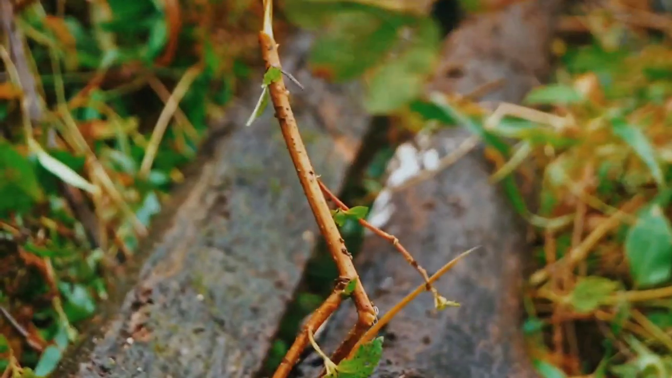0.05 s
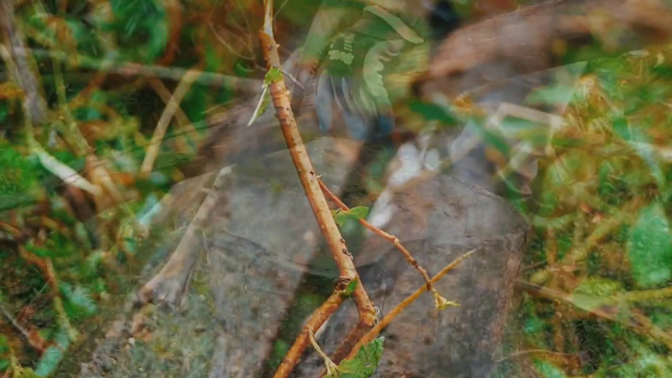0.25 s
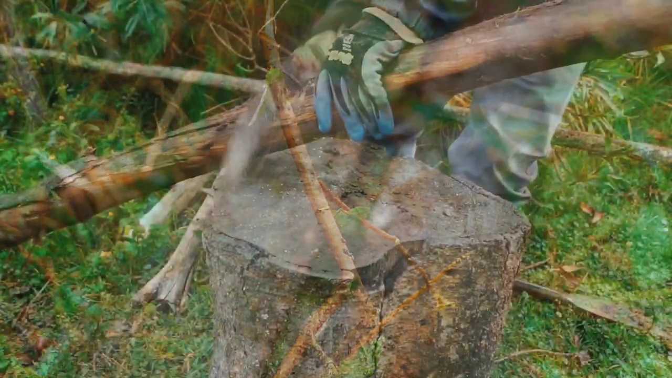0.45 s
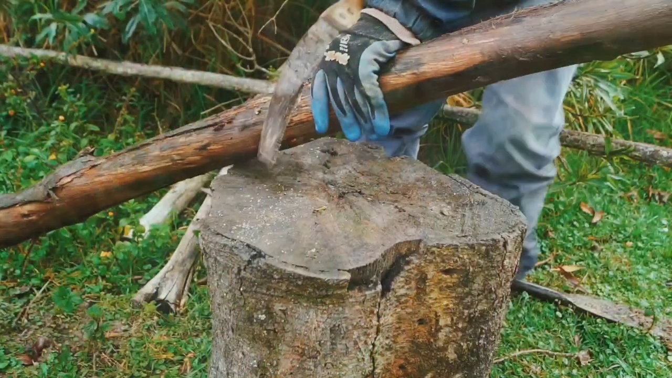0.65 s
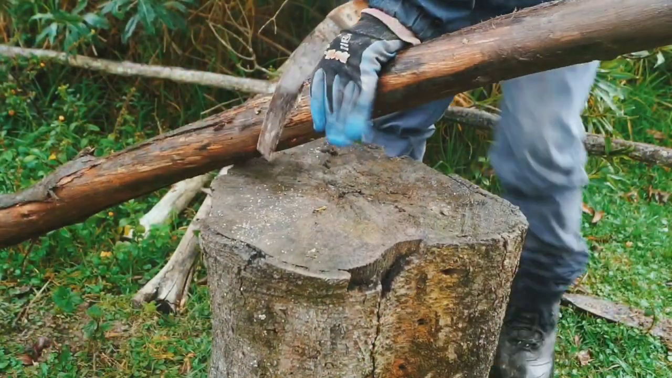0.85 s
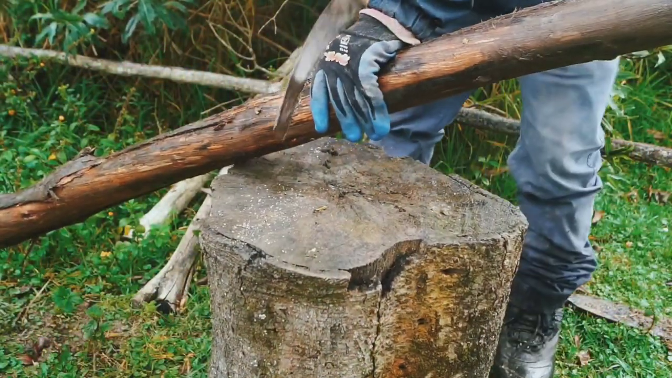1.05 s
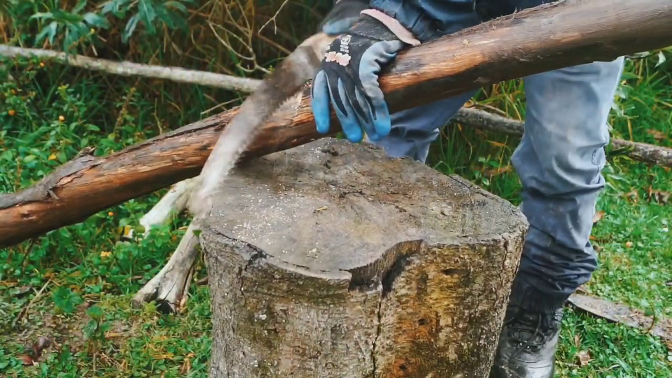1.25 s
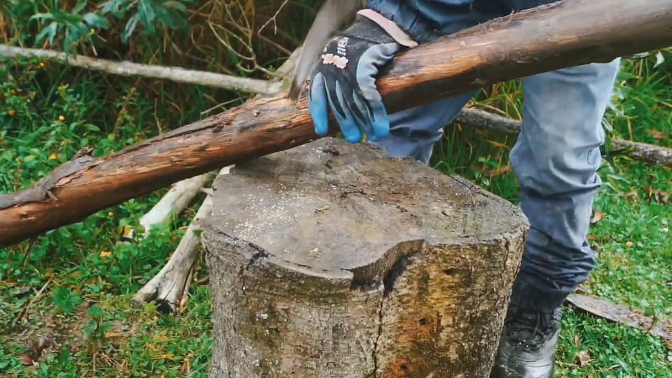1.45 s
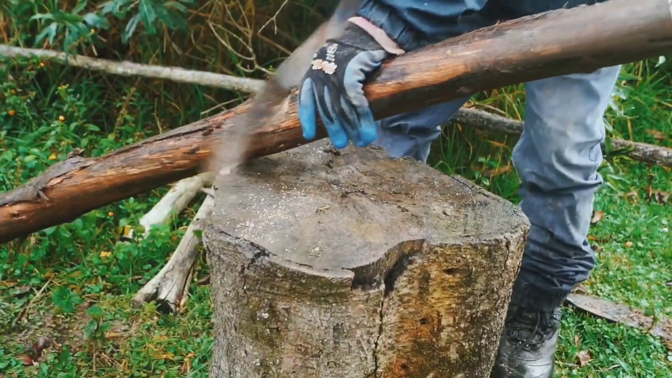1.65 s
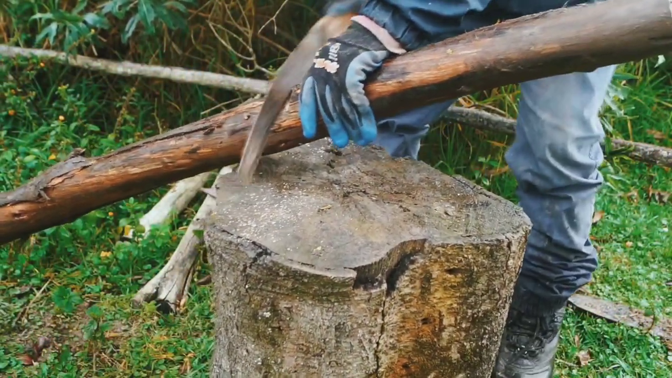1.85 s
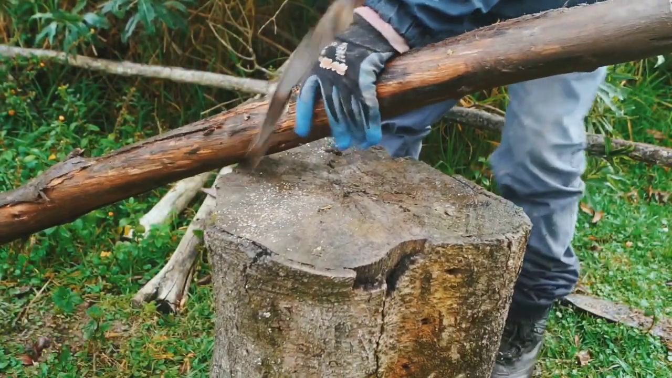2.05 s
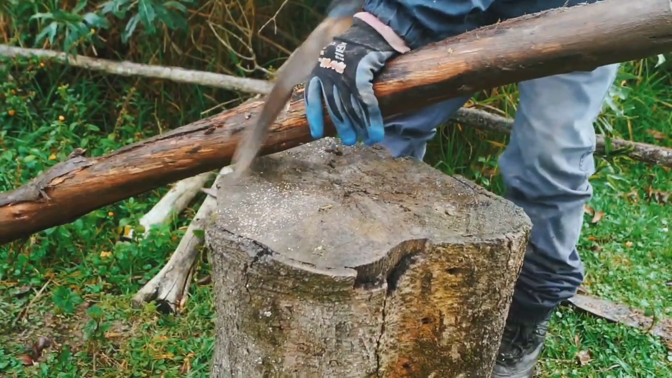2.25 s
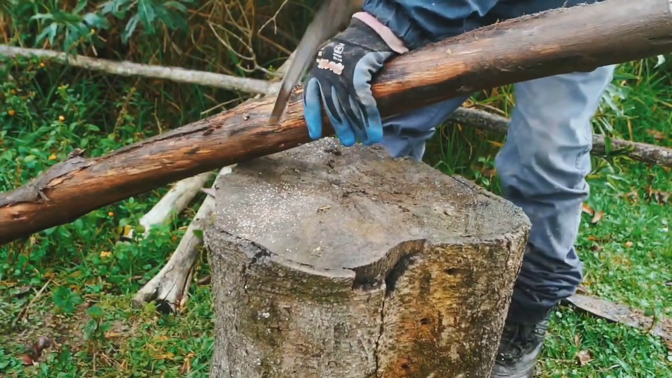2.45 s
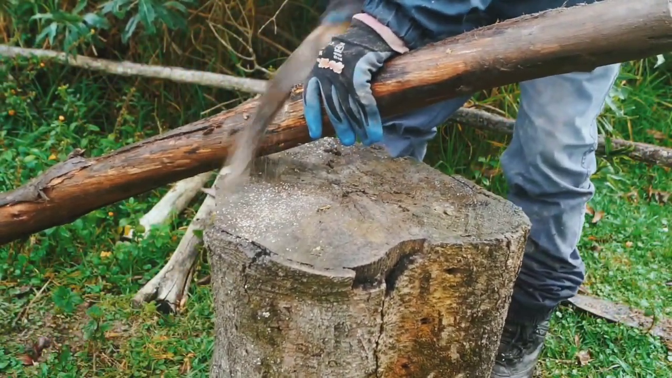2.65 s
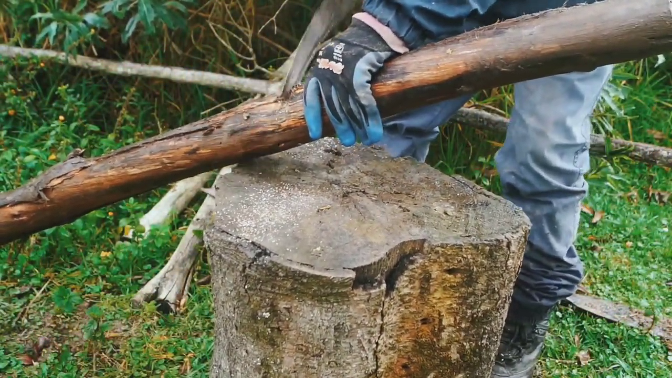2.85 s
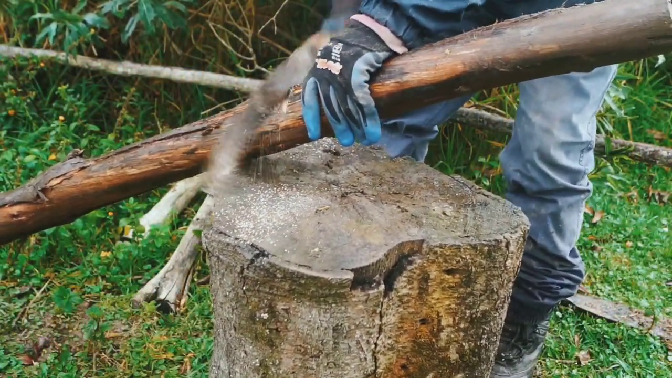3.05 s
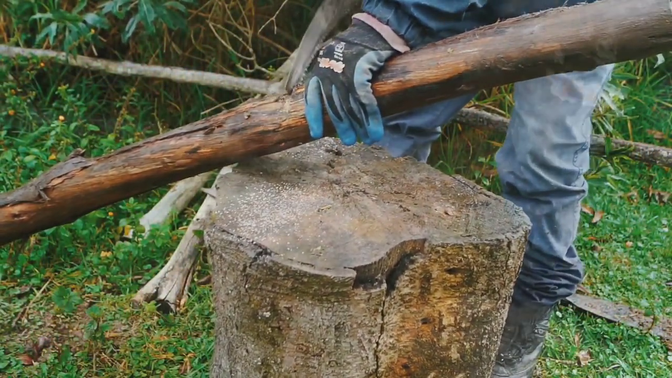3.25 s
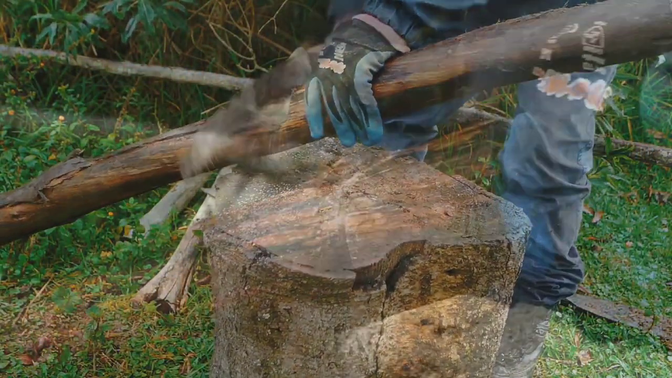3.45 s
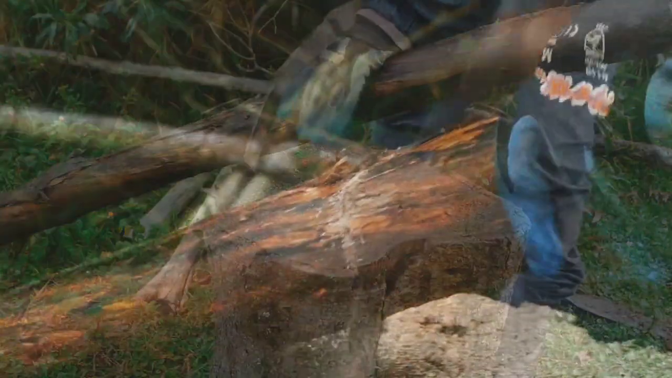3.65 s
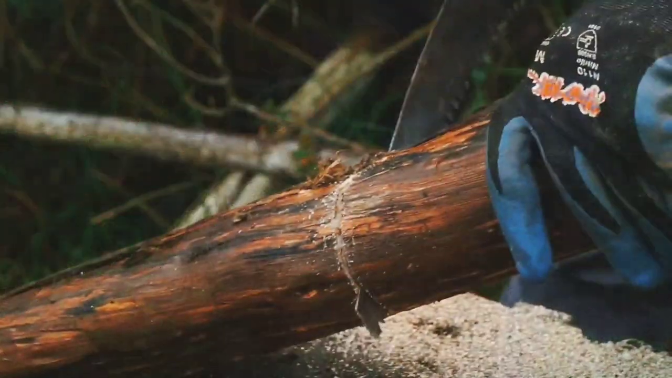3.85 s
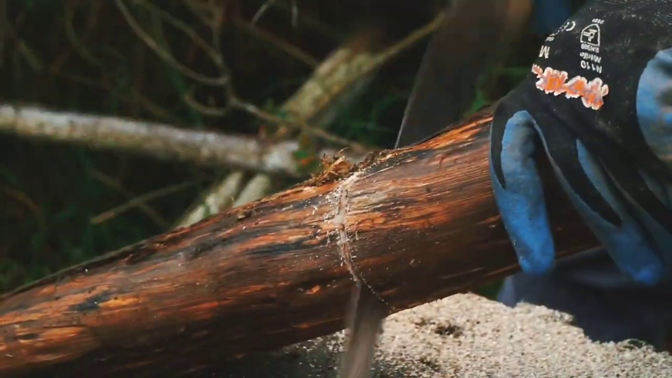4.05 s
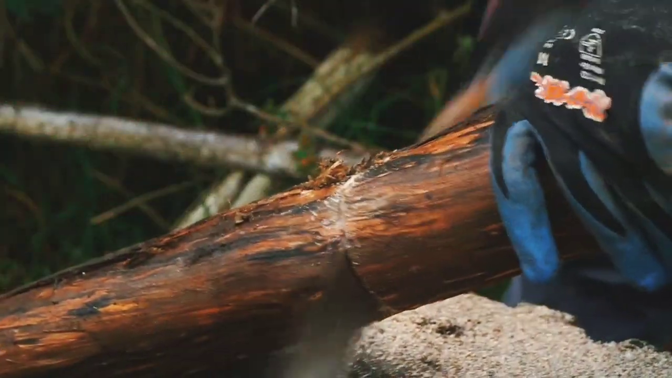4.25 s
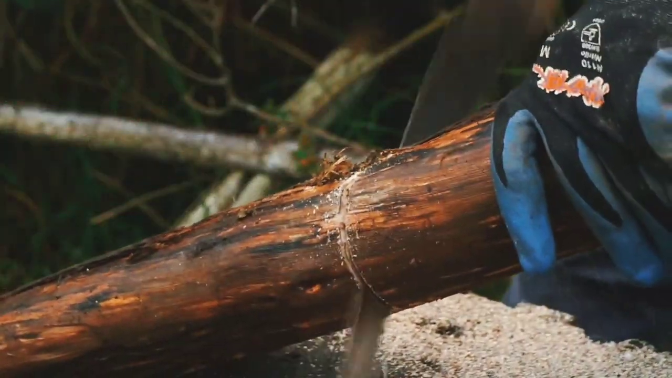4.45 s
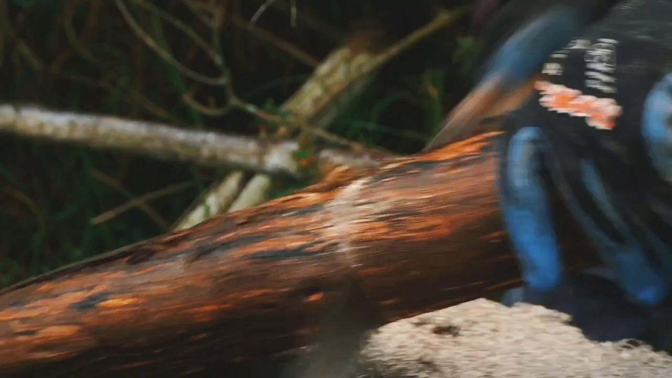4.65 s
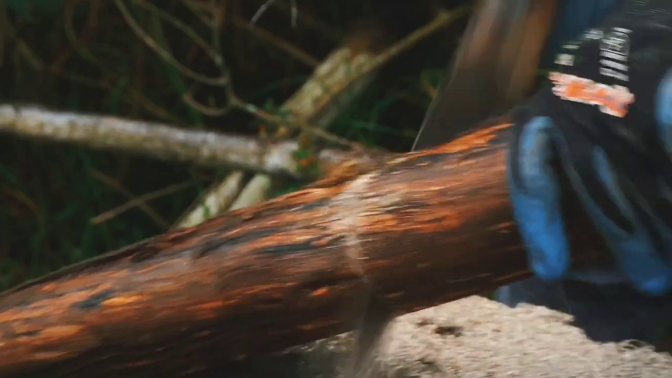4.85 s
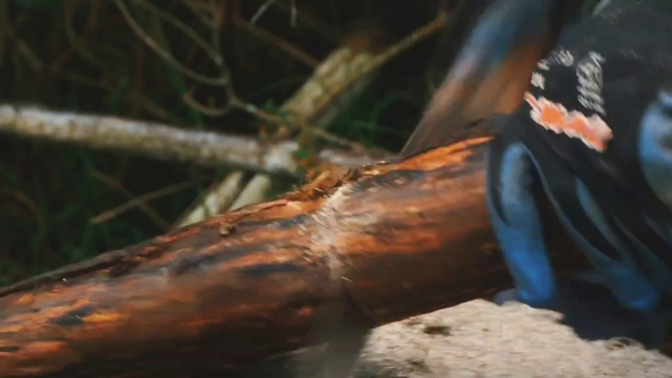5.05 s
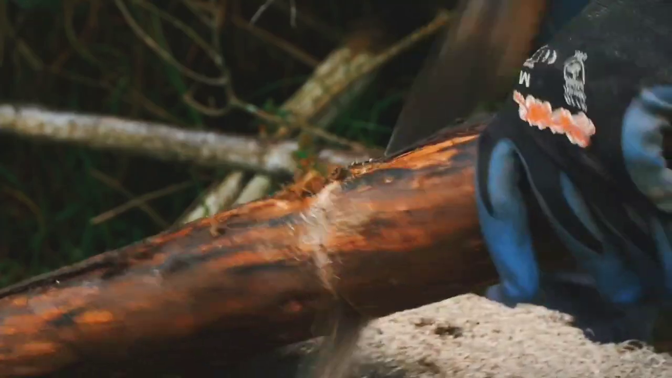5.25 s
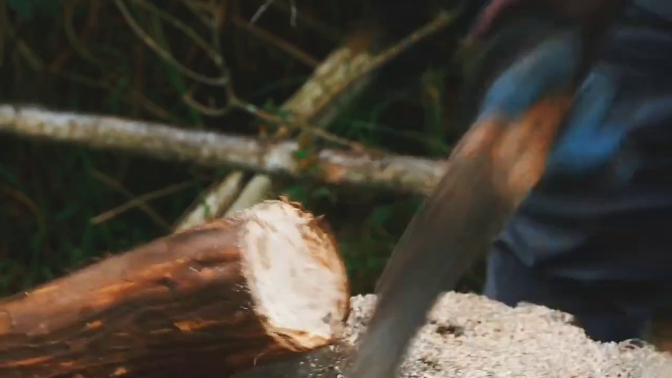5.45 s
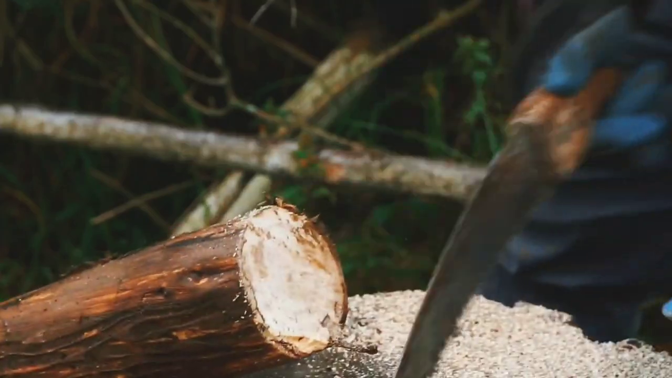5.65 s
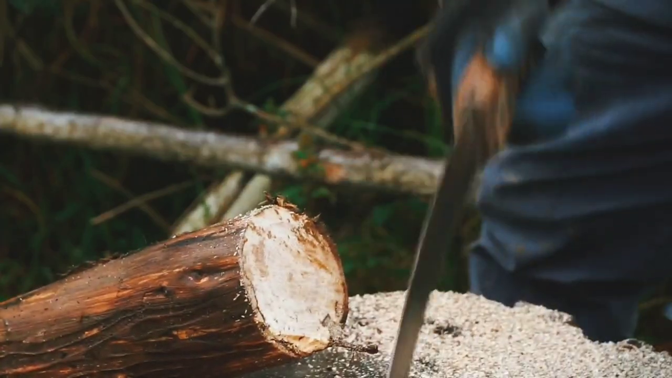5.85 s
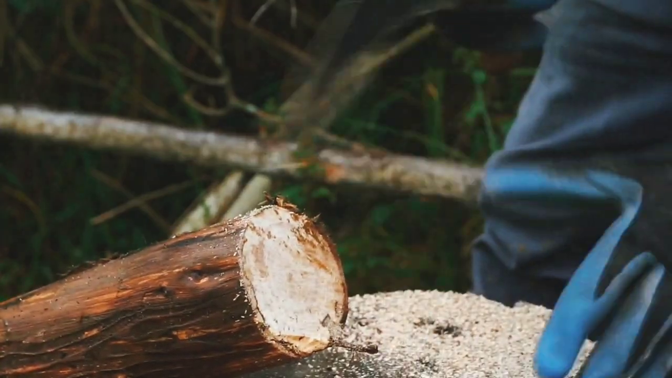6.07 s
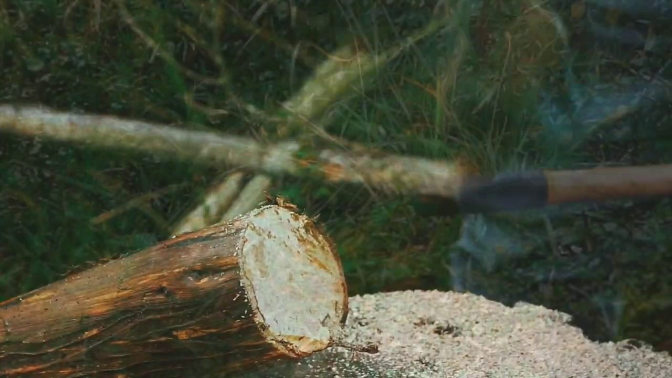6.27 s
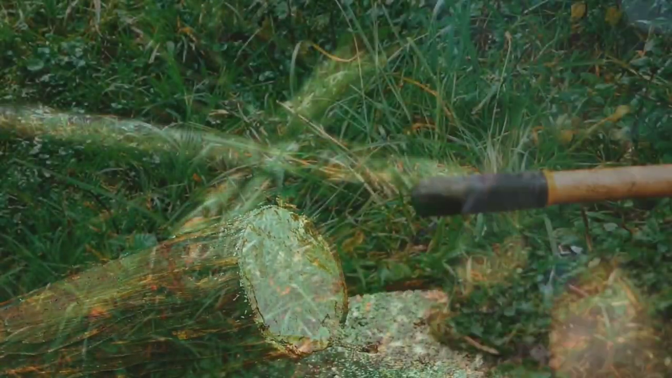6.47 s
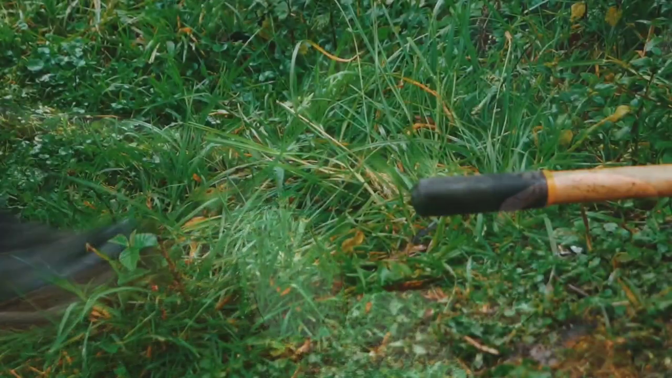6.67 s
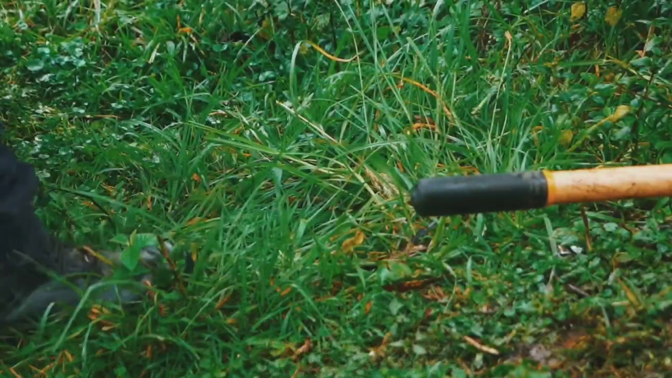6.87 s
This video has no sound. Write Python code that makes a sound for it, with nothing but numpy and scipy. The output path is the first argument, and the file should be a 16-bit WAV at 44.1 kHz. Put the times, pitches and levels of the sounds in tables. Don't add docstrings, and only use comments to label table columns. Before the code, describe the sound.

Quiet outdoor air with a patchy leaf rustle runs throughout, in wide, dry stereo. At about 0.1 and 0.2 s two hollow wooden knocks sound, followed by a short saw stroke at 0.3 s and a much weaker return at 0.5 s. A pause holds only faint taps and rubbing until a sharp knock at 0.9 s. From 1.0 s a hand saw works quickly, about four or five alternating strokes a second, each a gritty swelling rasp with hollow mid-pitched log resonance and airy blade hiss; a tooth catch pops at 1.5 s. Around 3.5 s the sound moves closer, louder and slightly brighter, with a short lull before 4.05 s. Catches click at 4.1 and 5.3 s. At 5.4 s the wood gives way with a bright double snap; the offcut lands with a small thud near 5.75 s. Light scrapes and small woody taps fade until 6.9 s.

```python
import sys
import numpy as np
from scipy import signal
from scipy.fft import rfft, irfft, next_fast_len
from scipy.io import wavfile

SR = 44100
rng = np.random.default_rng(int(sys.argv[2]) if len(sys.argv) > 2 else 0)


def how_loud(loudness_db):
    steps = np.asarray(loudness_db, float) / 20
    return 10 ** steps


def transcribe(u):
    v = np.clip(np.atleast_2d(u).T, -1, 1)
    q = np.round(v * 32767).astype(np.int16)
    wavfile.write(sys.argv[1], SR, q)


N = 304646
FFT_SIZE = next_fast_len(N)
HZ = np.fft.rfftfreq(FFT_SIZE, 1 / SR) + 1e-3


def saw():
    # frequency in Hz, level in dB per Hz.
    fibres_far = [(450, -7), (800, 5.5), (1000, -4), (1300, 5), (1700, 3), (2500, 3), (3300, 1), (4100, -4),
                  (4500, -9.5)]
    fibres_near = [(450, -9.5), (700, -1), (940, 0), (1300, 2.5), (1900, 1.5), (2600, -4), (3400, -2),
                   (4100, -8), (4500, -15)]
    hiss_colour = [(4700, -11.5), (5100, -7.5), (5450, -6), (5900, -5.5), (6800, -4.5), (7500, -6.5),
                   (8100, -7), (8800, -8.5), (9400, -6), (11200, -10.5)]
    # frequency in Hz, width in Hz, level in dB.
    log_far = [(660, 67, 11), (909, 60, 9), (1140, 54, 18.5), (1214, 92, 6), (1446, 91, 20.5),
               (1497, 204, 12.5), (2590, 400, -5.5), (5350, 230, 4)]
    log_near = [(645, 59, 2.9), (773, 61, 10), (831, 59, 11.7), (1043, 44, 21.5), (1150, 68, 11.5),
                (1430, 100, 8.3), (1820, 82, 4), (2490, 520, 8.9)]
    log_breaking = [(643, 180, 9.5), (920, 100, 8), (1150, 60, -1), (1830, 200, 11), (2260, 280, 14)]
    # frequency in Hz, width in Hz, level in dB.
    bend_far = [(247, 51, -10), (290, 54, -13.5), (418, 50, 1.7)]
    bend_near = [(235, 65, -9.5), (324.5, 35, 2.5), (396, 162, 1.5)]
    move_s = (3.4, 3.6)
    break_start_s, break_end_s = 5.25, 5.56
    near_hiss_db = 1
    rumble_cut_hz = 144

    t = np.arange(N) / SR
    cut_db, hiss_db, boom_db, ring_db = strokes()
    tear = clumps(teeth(cut_db, bite_db=1.0, grain_db=2.5), 1675, 4310, depth_db=5.5, count=16)
    shake = teeth(cut_db, bite_db=0.0, grain_db=2.27)
    near = np.interp(t, move_s, [0, 1])
    breaking = (t > break_start_s) & (t < break_end_s)
    stages = ((1 - near, fibres_far, log_far, bend_far),
              (near * ~breaking, fibres_near, log_near, bend_near),
              (breaking, fibres_near, log_breaking, bend_near))
    whole = 0
    for share, fibres, log, bend in stages:
        torn = rms_one(colour(tear, fibres))
        ringing = modes(shake, log, wander_db=1.5, order=2)
        wood = rms_one(torn + how_loud(ring_db) * ringing)
        boom = rms_one(modes(shake, bend, wander_db=5.0, order=2))
        whole = whole + np.sqrt(share * 1.0) * (wood + how_loud(boom_db) * boom)
    rasp = clumps(teeth(cut_db, bite_db=0.0, grain_db=4.0), 5157, 11300, depth_db=5.5, count=12)
    whole = whole + how_loud(hiss_db + near_hiss_db * near) * rms_one(colour(rasp, hiss_colour))
    return highpass(how_loud(cut_db) * whole, rumble_cut_hz)


def strokes():
    # start in seconds, length in seconds, crest level in dB,
    # crest place from 0 to 1, extra boom in dB.
    pushes = [(0.278, 0.21, -35.5, 0.68, -4.5), (0.995, 0.14, -40.5, 0.62, 2.5),
              (1.11, 0.21, -28.5, 0.69, 4), (1.522, 0.24, -28.5, 0.67, 1), (2.033, 0.19, -30, 0.62, 7),
              (2.467, 0.18, -27.5, 0.54, -0.7), (2.855, 0.21, -28.5, 0.67, -0.8),
              (3.282, 0.28, -32, 0.59, -0.6), (4.047, 0.19, -27, 0.54, -3), (4.396, 0.21, -25, 0.71, -2),
              (4.789, 0.21, -25, 0.73, -3), (5.235, 0.11, -27.5, 0.62, -10), (5.305, 0.11, -27, 0.49, -3)]
    pulls = [(0.5, 0.26, -43, 0.31, 2), (1.325, 0.24, -25.5, 0.49, -1.5), (1.788, 0.28, -34, 0.49, 1),
             (2.234, 0.22, -26.5, 0.49, 0), (2.659, 0.22, -26, 0.42, -1), (3.096, 0.23, -28, 0.34, 3),
             (3.52, 0.26, -29.5, 0.63, -1.5), (4.2, 0.24, -24.5, 0.61, -7), (4.62, 0.225, -24, 0.4, -2.5),
             (4.97, 0.25, -24.5, 0.57, -8.5), (5.42, 0.13, -26, 0.37, -4)]
    # time in seconds, level in dB.
    rubbing = [(0.2, -56), (0.235, -45.5), (0.31, -50), (0.5, -58), (0.75, -52), (0.905, -57), (0.924, -50),
               (0.966, -63.5), (5.5, -57.5), (5.56, -46), (5.72, -47.5), (5.786, -38.5), (5.84, -53),
               (6.02, -45), (6.07, -39), (6.32, -47.5), (6.55, -51.5), (6.9, -48)]
    # hiss, boom and ring at (start, end) of a stroke, dB over the cut
    push_laws = ((-9.5, -4), (-15, -8), (-0.5, 3.5))
    pull_laws = ((-6.5, -8.5), (-17.5, -11.5), (-0.5, 5.3))
    rub_hiss_db, rub_boom_db, rub_ring_db = -5, -14.5, -2.2
    speed_power = 2.065
    steady = 0.87
    hiss_slow_db = -4

    t = np.arange(N) / SR
    power = how_loud(2 * in_time(rubbing)[0])
    mix = power * np.array([[rub_hiss_db], [rub_boom_db], [rub_ring_db]])
    for table, laws in ((pushes, push_laws), (pulls, pull_laws)):
        for s, length, crest_db, crest, weight_db in table:
            now = slice(round(s * SR), round((s + length) * SR))
            along = np.clip((t[now] - s) / length, 0, 1)
            skew = np.log(0.5) / np.log(np.clip(crest, 0.1, 0.9))
            speed = np.abs(np.sin(np.pi * along ** skew))
            held = np.tanh(steady * speed) / np.tanh(steady)
            stroke = how_loud(2 * crest_db) * held ** (2 * speed_power)
            hiss, boom, ring = (first + (last - first) * along for first, last in laws)
            power[now] += stroke
            mix[:, now] += stroke * np.array([hiss + hiss_slow_db * (1 - speed), boom + weight_db, ring])
    return 10 * np.log10(power), *(mix / power)


def teeth(cut_db, bite_db, grain_db):
    slow_hz, fast_hz = 59.5, 169.9
    speed = np.clip((cut_db + 46.5) / 20, 0, 1)
    bite_hz = (slow_hz + (fast_hz - slow_hz) * speed) * how_loud(2.0 * drift(40))
    count = np.cumsum(bite_hz / SR)
    strength = rng.standard_normal(4000)[count.astype(int) % 4000]
    bites = how_loud(bite_db * (1.3 - 4.4 * (count % 1) + 0.5 * strength))
    grains = how_loud(grain_db * np.minimum(rng.exponential(1, N), 6))
    return rms_one(bites * grains * rng.standard_normal((2, N)))


def clumps(x, low_hz, high_hz, depth_db, count):
    width = (high_hz / low_hz) ** (1 / count) - 1
    flares = [(hz, width * hz, -3) for hz in np.geomspace(low_hz, high_hz, count)]
    unrelated = x * np.sign(np.roll(x, 900, axis=1))
    return x + modes(unrelated, flares, wander_db=depth_db, rate=29.5)


def modes(x, table, wander_db, rate=14, order=1):
    total = 0
    for k, (hz, width, db) in enumerate(table):
        drive = x * how_loud(db + wander_db * drift(rate))
        total = total + (-1) ** k * resonate(drive, hz, width, order=order)
    return total


def resonate(x, hz, width_hz, order=1):
    r = np.exp(-np.pi * width_hz / SR)
    stage = [(1 - r * r) / 2, 0, (r * r - 1) / 2, 1, -2 * r * np.cos(2 * np.pi * hz / SR), r * r]
    return signal.sosfilt([stage] * order, x)


def knocks():
    # time in seconds, peak in dB, wood pitch in Hz, crack in dB over peak.
    snaps = [
        (0.1165, -16.5, 655, -23),
        (0.2085, -16, 498, -21),
        (0.595, -28, 1860, -31),
        (0.9125, -21, 1500, -9),
        (0.925, -27, 1700, -10),
        (4.975, -18, 340, -29.5),
        (5.385, -11.5, 474, -28),
        (5.412, -15.5, 1820, -6),
        (5.42, -15.5, 850, -12),
        (5.775, -24.5, 2430, 0),
    ]
    # time in seconds, peak in dB, wood pitch in Hz,
    # crack in dB over peak.
    catches = [(0.279, -36, 1140, -5), (0.624, -42, 1150, 4), (0.656, -32, 1520, -1),
               (0.677, -32, 1430, -15), (1.47, -16.5, 1168, -18), (1.689, -34, 1546, -17),
               (4.092, -16.5, 1150, -19.5), (4.638, -29.5, 1099, -17), (5.016, -25.5, 1120, -2.5),
               (5.296, -17.5, 970, -2.5), (5.304, -20, 674, -22), (5.622, -31.5, 1930, -11),
               (5.694, -33.5, 1750, 7), (5.954, -30, 1030, -11.5), (6.074, -29.5, 730, 0.5),
               (6.11, -29, 1035, -2), (6.167, -34, 1014, 5), (6.333, -42.5, 1240, 1.5),
               (6.419, -36, 1004, 1)]
    # time in seconds, peak in dB.
    thuds = [
        (0.209, -40),
        (0.911, -58),
        (2.261, -52),
        (5.385, -54),
        (5.696, -37),
        (5.776, -32.5),
    ]
    snap_t60_s, catch_t60_s, crack_t60_s, thud_t60_s = 0.037, 0.082, 0.014, 0.04
    partials = ((0.7, 0.15), (1, 0.54), (1.35, 0.28), (1.9, 0.23))

    t = np.arange(6000) / SR
    out = np.zeros((2, N + len(t)))
    crack_band = signal.butter(2, [1200, 6500], "band", fs=SR, output="sos")
    for table, t60 in ((snaps, snap_t60_s), (catches, catch_t60_s)):
        fade = how_loud(-60 * t / t60)
        for s, peak_db, hz, crack_db in table:
            rise = 1 - np.exp(-t * hz * 4.8)
            wood = 0
            for ratio, share in partials:
                wood = wood + share * np.sin(2 * np.pi * ratio * hz * t) * fade ** ratio
            wood = highpass(rise * wood, 0.5 * hz)
            splinter = signal.sosfilt(crack_band, rng.standard_normal((2, len(t))))
            crack = how_loud(crack_db) * how_loud(-60 * t / crack_t60_s) * splinter
            i = round(s * SR)
            out[:, i:i + len(t)] += how_loud(peak_db) * (0.99 * wood * [[1], [0]] + 1.46 * crack)
    body = np.sin(2 * np.pi * 95 * t) + np.sin(2 * np.pi * 210 * t)
    thud = how_loud(-60 * t / thud_t60_s) * (1 - np.exp(-t / 0.0015)) * body
    for s, peak_db in thuds:
        i = round(s * SR)
        out[0, i:i + len(t)] += how_loud(peak_db) * thud
    return out[:, :N]


def air():
    # time in seconds, level in dB.
    air_level = [(0.0, -43.5), (0.38, -46.5), (1.0, -43.5), (1.54, -43.5), (1.65, -45.5), (2.8, -42),
                 (3.59, -46.5), (3.71, -46.5), (4.11, -44), (4.26, -43.5), (5.34, -41), (5.46, -41),
                 (6.55, -47.5), (6.9, -46.5)]
    # frequency in Hz, level in dB per Hz.
    air_colour = [(18, -60), (30, -52), (110, -22), (227, -10), (364, -7.5), (567, 0), (675, 0), (1130, -1),
                  (1350, -3), (9030, -13.5), (11000, -16), (14300, -51)]
    level_db = in_time(air_level)[0] + 0.81 * drift(0.81)
    leaves = clumps(rng.standard_normal((2, N)), 40, 320, depth_db=5.0, count=5)
    return how_loud(level_db) * rms_one(colour(leaves, air_colour))


def ports(pair, table):
    lead, alike, balance_db = over_hz(table)
    alike = np.clip(alike, 0, 1)
    same, other = rfft(pair, FFT_SIZE)
    shared = how_loud(balance_db) * np.sqrt(alike) * np.exp(1j * lead)
    own = how_loud(balance_db) * np.sqrt(1 - alike)
    mean = np.sqrt(np.abs(1 + shared) ** 2 + own ** 2) / 2
    left = shared * same + own * other
    return irfft(np.array([left, same]) / mean, FFT_SIZE)[:, :N]


def rms_one(x):
    return x / np.sqrt(np.mean(x ** 2) + 1e-20)


def in_time(rows):
    s, *columns = np.transpose(rows)
    return [np.interp(np.arange(N) / SR, s, c) for c in columns]


def over_hz(rows):
    hz, *columns = np.transpose(rows)
    return [np.interp(np.log(HZ), np.log(hz), c) for c in columns]


def colour(x, spectrum):
    outside = np.maximum(spectrum[0][0] / HZ, 1) * np.maximum(HZ / spectrum[-1][0], 1)
    gain = how_loud(over_hz(spectrum)[0]) / outside ** 4
    return irfft(rfft(x, FFT_SIZE) * gain, FFT_SIZE)[..., :N]


def highpass(x, hz):
    return signal.sosfilt(signal.butter(2, hz, "high", fs=SR, output="sos"), x)


def drift(rate):
    r = np.exp(-80 * np.pi * rate / SR)
    slow = signal.lfilter([1], [1, -2 * r, r * r], rng.standard_normal(N // 40 + 2002))[2000:]
    return np.interp(np.arange(N) / 40, np.arange(len(slow)), rms_one(slow))


def scene():
    # frequency in Hz, left lead in radians,
    # likeness from 0 to 1, left over right in dB.
    ports_saw = [(60, 1.6, 0, 11), (150, 1.7, 0.67, 3.5), (340, 2.21, 0.9, -1), (1230, 2.49, 1, -1.5),
                 (3560, 2.15, 0.86, -4.5), (4730, 1.7, 0.7, -7.5), (5460, 4, 0.3, -12), (5530, .5, 0, 1.5),
                 (6300, .05, 0.6, -11), (7350, .01, 0.6, -7), (10300, .01, 0.4, -15)]
    ports_air = [(100, 5.8, 0.077, 0.5), (285, 4, 0.33, 0), (730, 2.66, 0.67, 0.2), (1980, 3.77, 0.57, 1),
                 (3980, 3.8, 0.19, 2), (5730, 3.9, .08, 5.5), (6260, 15.6, 0.65, 1),
                 (7960, 3.94, 0.33, 5.5), (11540, 15.2, 0.1, 5)]
    return ports(saw() + knocks(), ports_saw) + ports(air(), ports_air)


def top_cut(x):
    return signal.sosfilt(signal.butter(12, 12180, fs=SR, output="sos"), x)


def record(dry):
    cutoff_hz = 10990
    cut = signal.sosfilt(signal.ellip(10, 0.5, 60, cutoff_hz, fs=SR, output="sos"), dry)
    return top_cut(cut)


dry = scene()
out = record(dry)
transcribe(out)
```